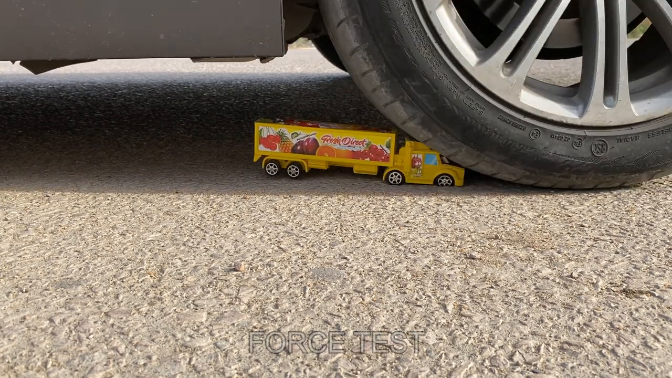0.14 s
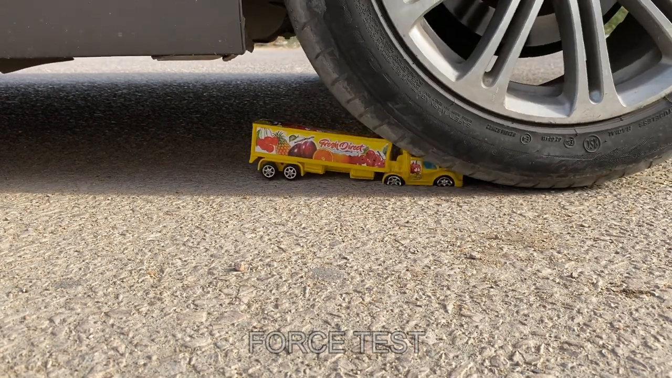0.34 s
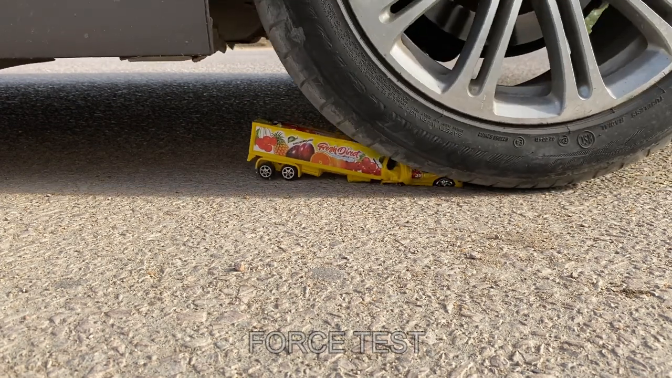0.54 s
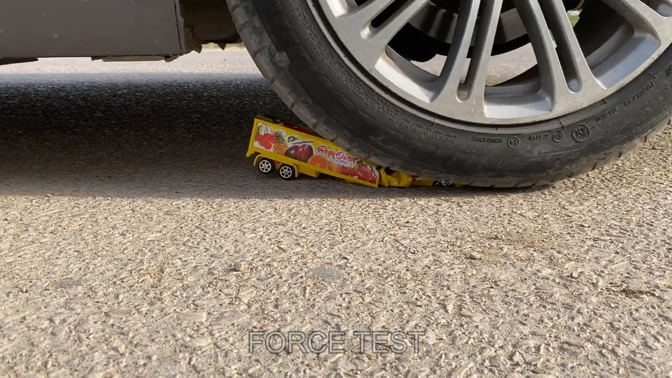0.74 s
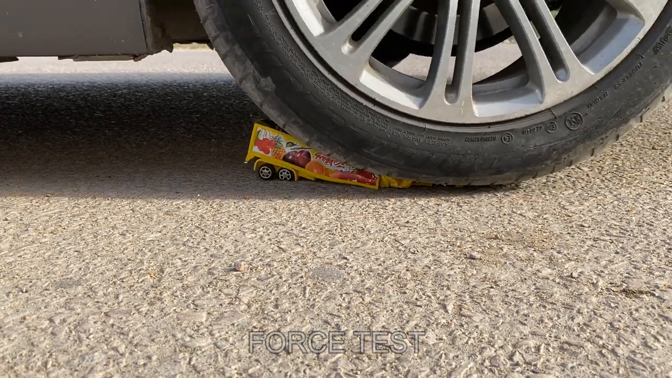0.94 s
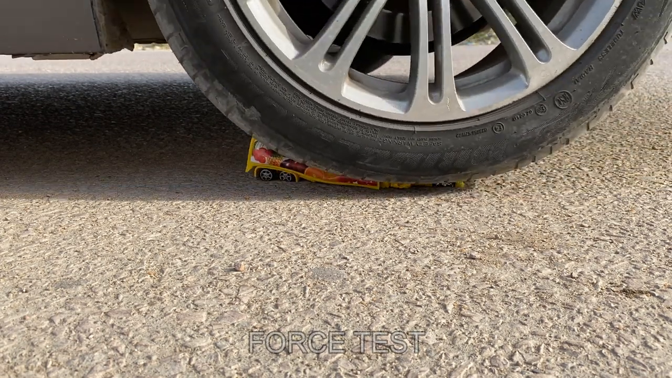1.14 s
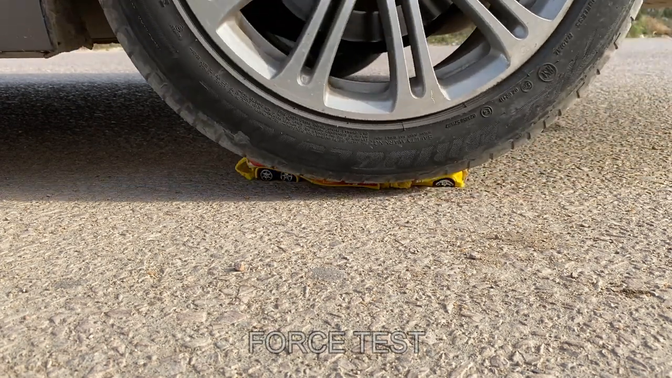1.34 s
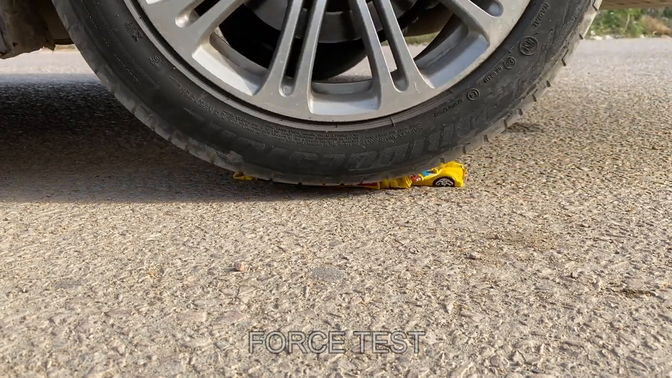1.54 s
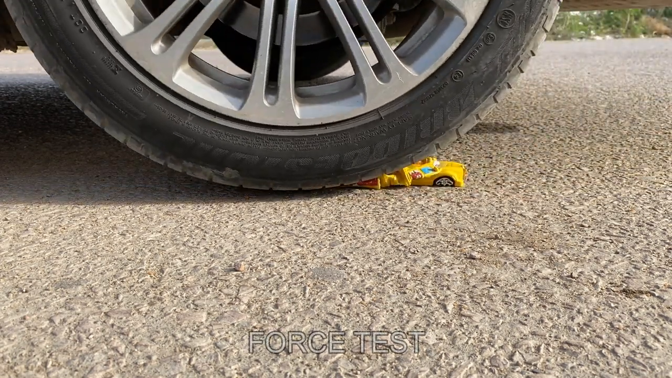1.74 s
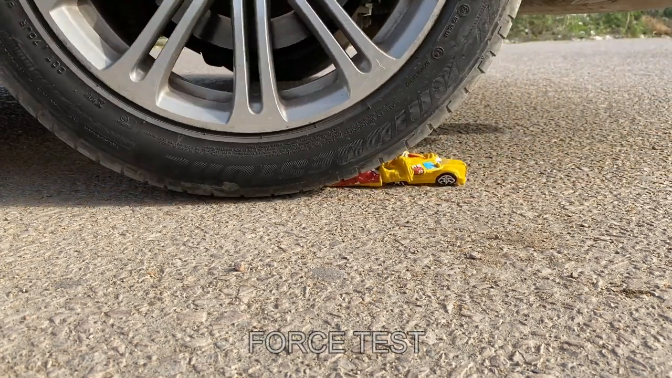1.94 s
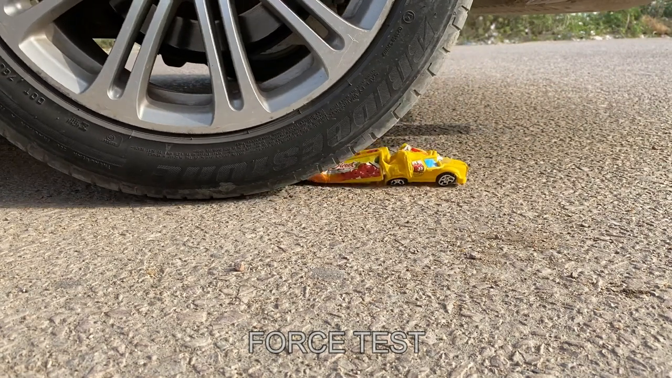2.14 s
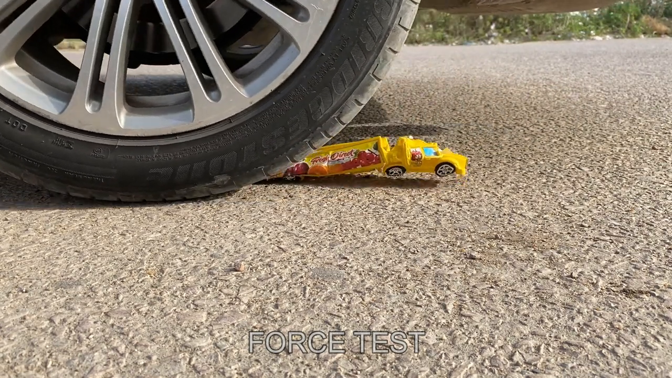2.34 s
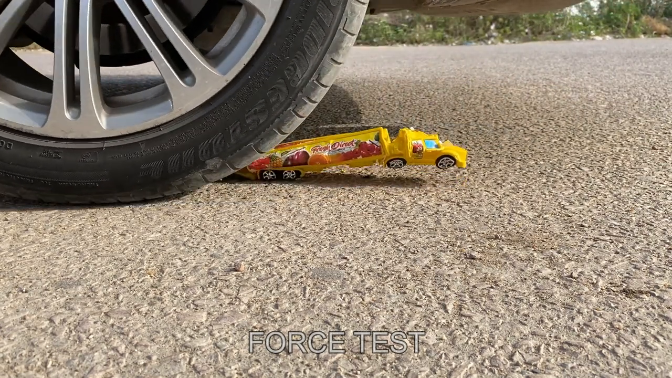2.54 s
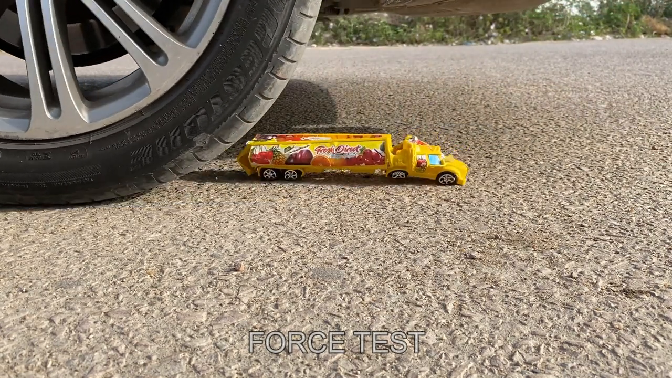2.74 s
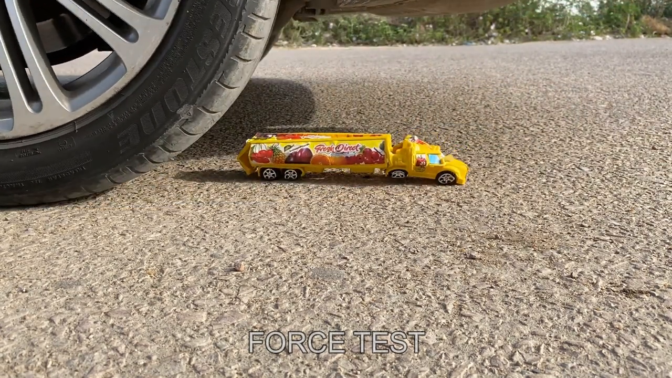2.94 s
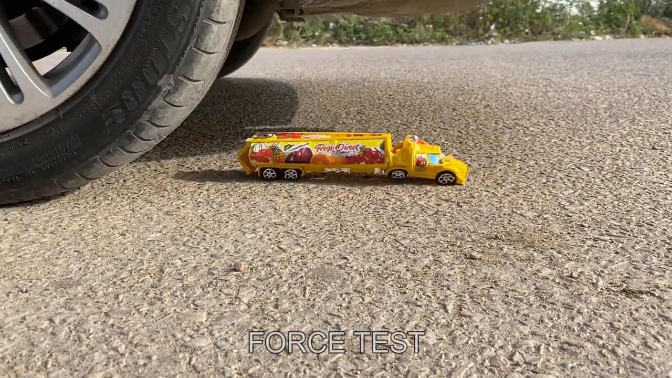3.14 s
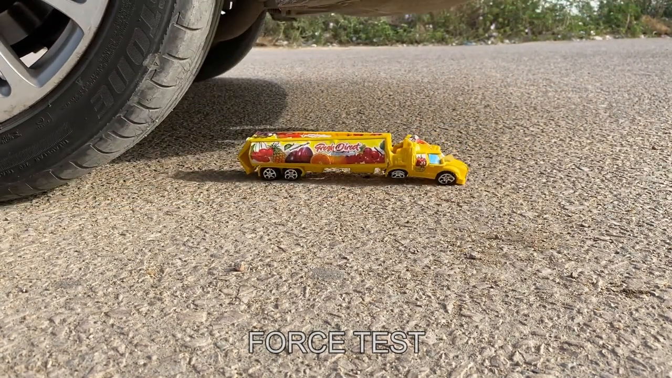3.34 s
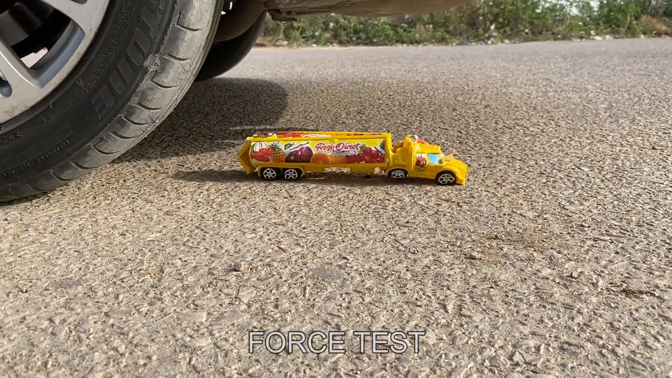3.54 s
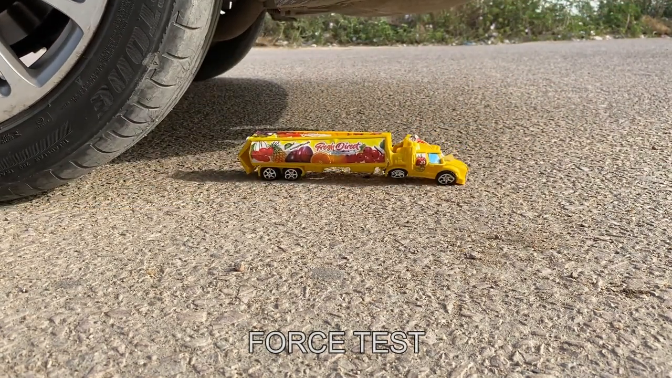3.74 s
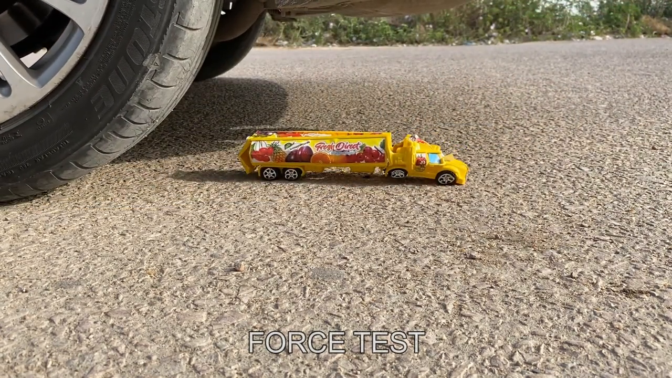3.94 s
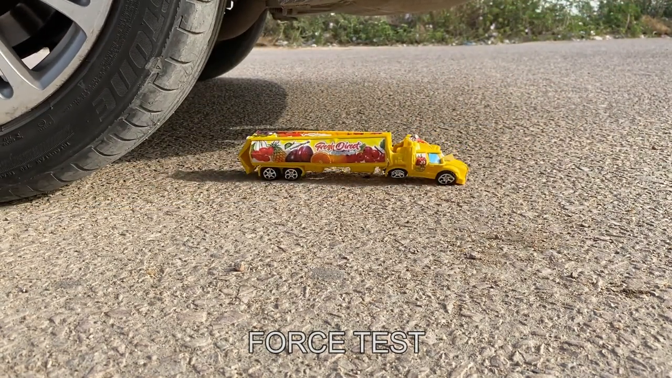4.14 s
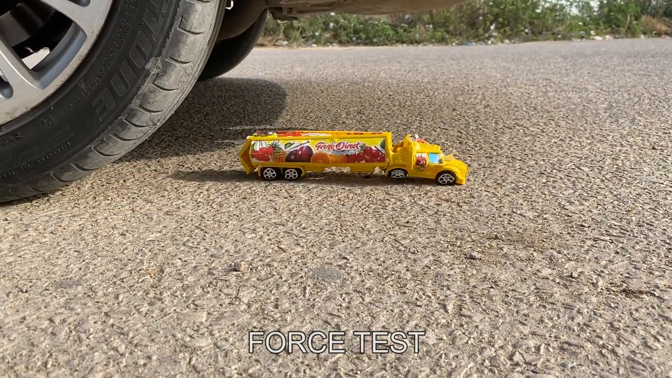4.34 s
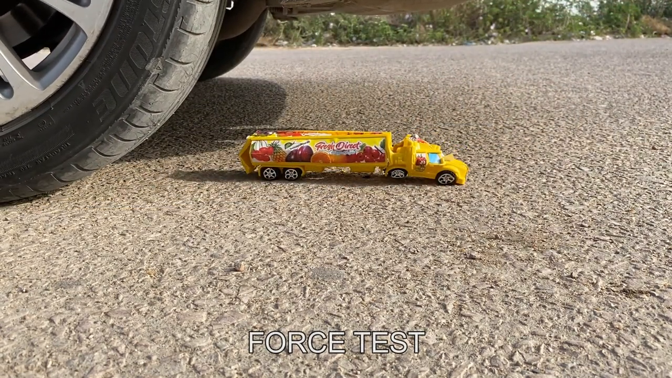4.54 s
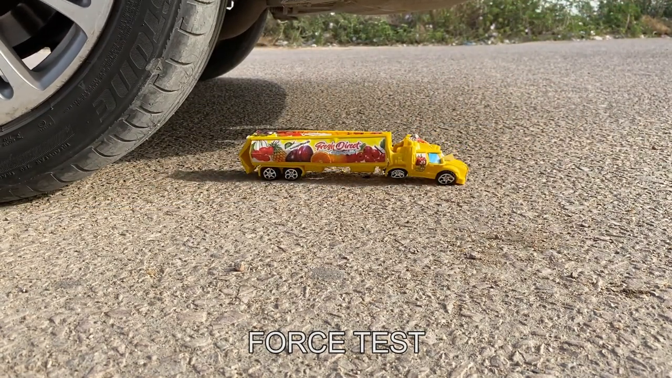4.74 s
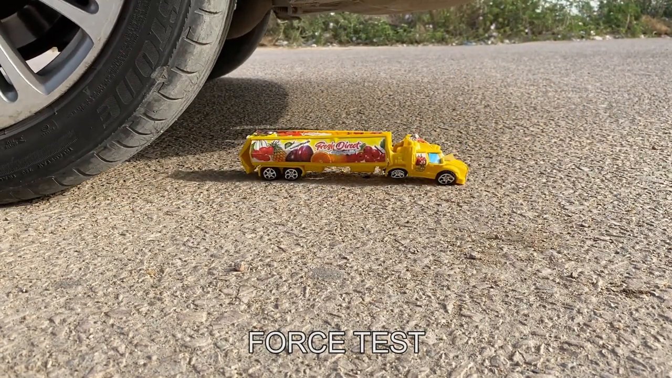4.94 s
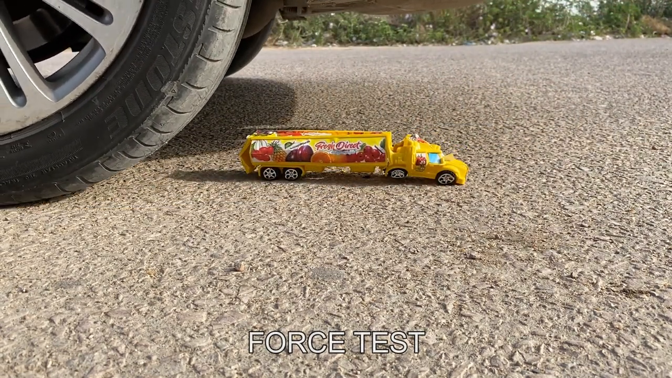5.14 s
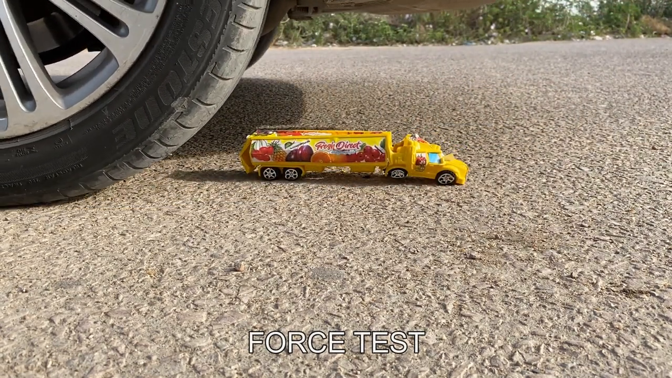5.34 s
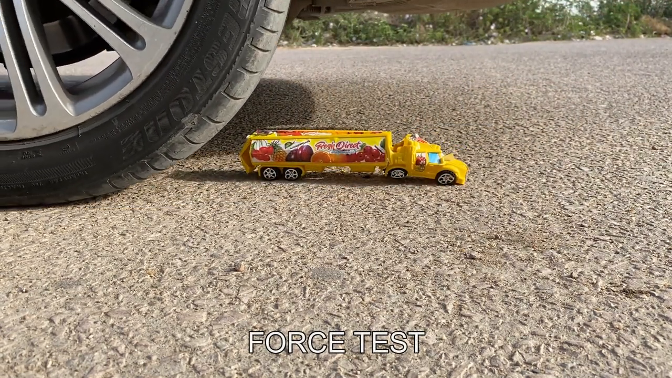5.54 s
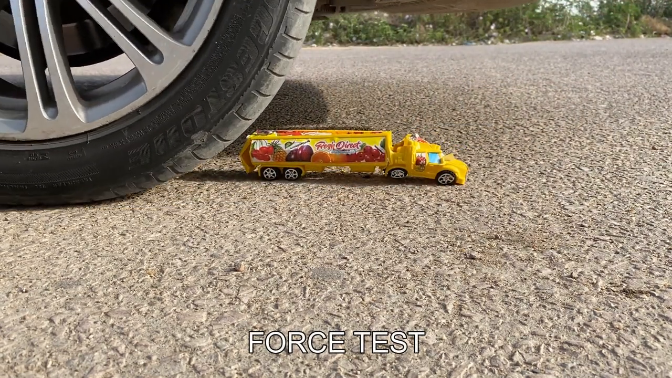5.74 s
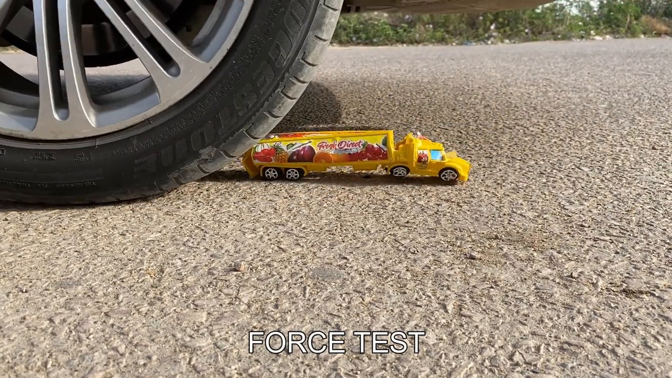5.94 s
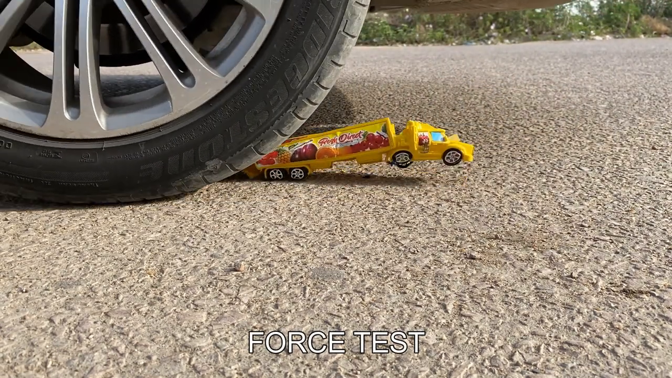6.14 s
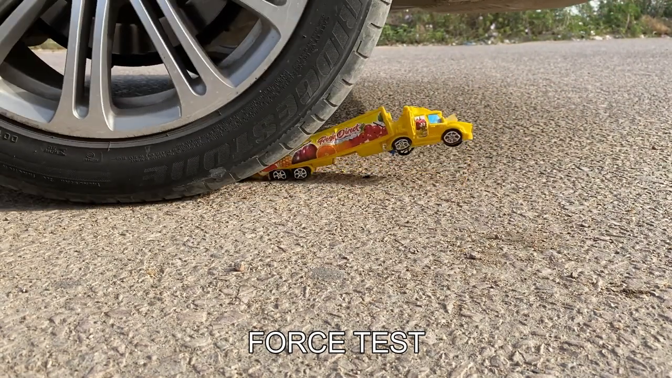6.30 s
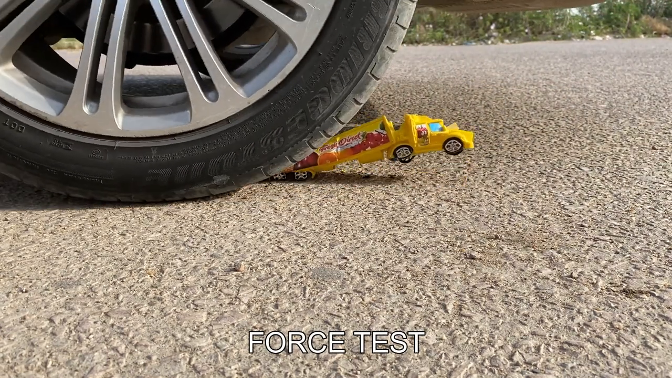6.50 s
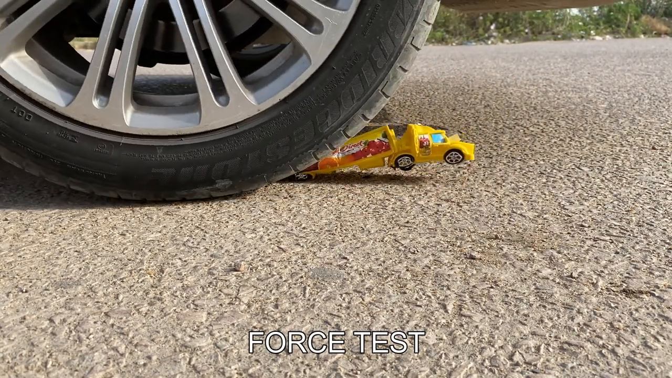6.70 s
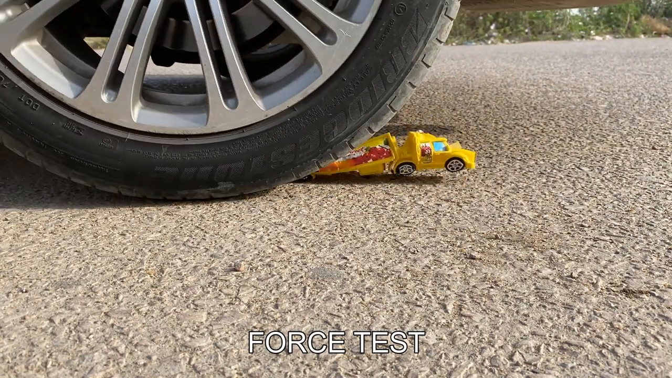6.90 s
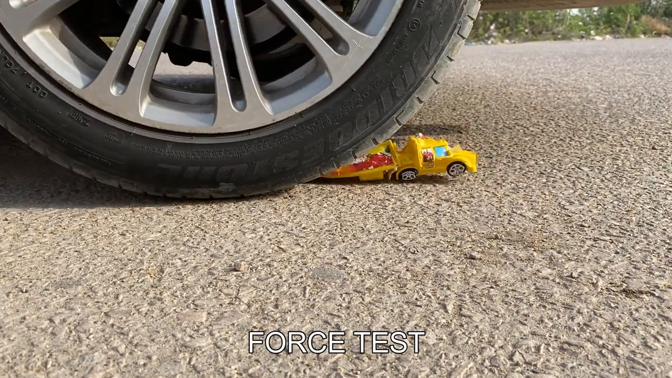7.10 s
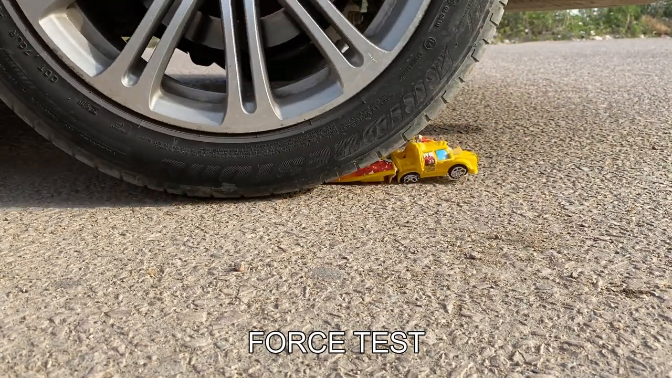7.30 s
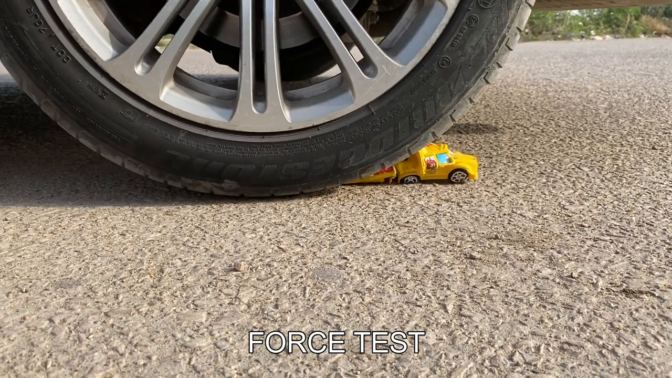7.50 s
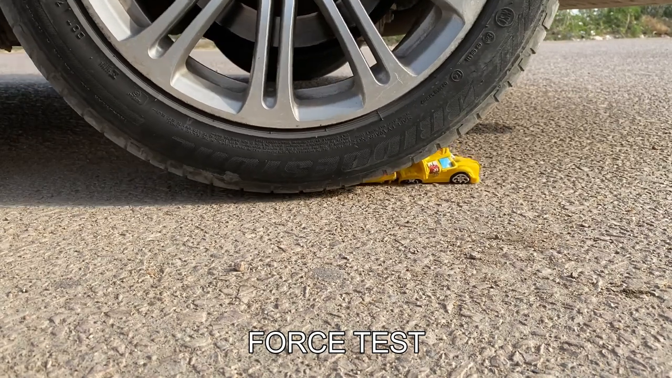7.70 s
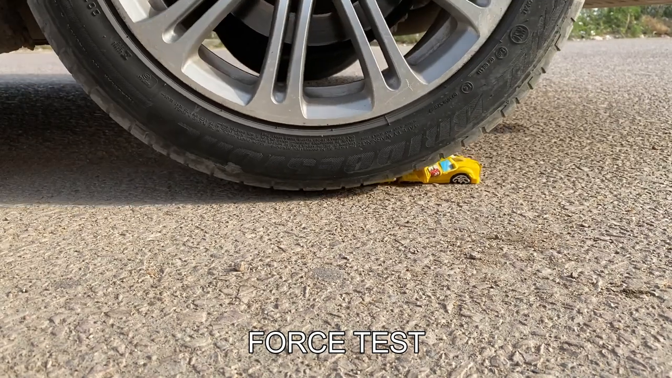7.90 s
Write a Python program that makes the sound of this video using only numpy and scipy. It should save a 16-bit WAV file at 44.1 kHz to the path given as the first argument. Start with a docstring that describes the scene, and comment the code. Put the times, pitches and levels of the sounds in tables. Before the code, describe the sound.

A low four-cylinder engine idles softly throughout, a pulsing rumble with faint rattle. From about 0.1 s a tyre bites into a hollow plastic toy on asphalt: sharp cracks, gritty rasps and fizzy splinters crowd together, with especially hard, boomy snaps near 0.4, 0.8, 0.9 and 1.2 s. After 1.4 s the crunching thins to small ticks, with a brighter snap near 2.1 s and tiny squeaks until 2.7 s. From 3 to 4.7 s there is mainly idle, rising in level and slightly in pitch; two soft dull bumps come at 4.8 s as the revs briefly dip. Around 6 s plastic creaks and squeaks again, with a loud crack at 6.2 s, then irregular drier snaps and gritty crackling, strong near 7.3, 7.5, 7.65 and 7.85 s, ending on a short harsh squeak at 7.9 s. Close, dry, ground-level outdoor sound with a very short under-car echo.

```python
"""A hollow plastic toy cracks and snaps under a car tyre on asphalt: bursts of force excite panel and air modes.
The car creeps over it, rolls off, waits and comes back; bent plastic creaks and squeaks by stick-slip.
The four-cylinder engine is a train of exhaust pulses coloured by its pipe, with flow noise, a softly
rattling valve gear and faint steady tones. Two microphone ports close to the ground hear the sum."""
import sys
import numpy as np
from scipy import signal
from scipy.fft import rfft, irfft, next_fast_len
from scipy.io import wavfile
from scipy.ndimage import uniform_filter1d, map_coordinates

SR = 44100
rng = np.random.default_rng(int(sys.argv[2]) if len(sys.argv) > 2 else 0)


def generate_wav(signal):
    """Clip the signal to [-1, 1] and save it as 16-bit WAV at the path in sys.argv[1]."""
    frames = np.transpose(np.atleast_2d(signal))
    scaled = np.clip(frames, -1, 1) * 32767
    pcm = np.round(scaled).astype(np.int16)
    wavfile.write(sys.argv[1], SR, pcm)


N = 351036

# Crankshaft speed: (time [s], speed [turns/s])
SHAFT_SPEED = [(0, 13.8), (.95, 13.83), (1.2, 13.69), (3.35, 13.69), (3.7, 14.44), (4.2, 14.53),
               (4.4, 15.1), (4.7, 14.95), (4.85, 14.4), (5.0, 13.3), (5.2, 13.35), (5.45, 14.2),
               (5.7, 14.37), (6.25, 14.35), (6.8, 14.635), (7.4, 14.42), (7.96, 14.46)]
# Engine loudness: (time [s], exhaust level [dB], engine bay level [dB])
ENGINE_LEVELS = [(0.0, -42.5, -47), (1.13, -40.5, -49), (1.42, -43.5, -50), (3.94, -34, -45.5),
                 (4.57, -28.5, -43), (4.88, -31.5, -42.5), (5.6, -29.5, -40), (7.96, -27, -36)]
# Colour of the exhaust pulse: (frequency [Hz], relative gain [dB])
PIPE_GAIN = [(14, -49), (22, 0.5), (29, -0.5), (41, -16), (58, 5), (73, 6), (88, -5), (150, 0.5),
             (197, -12), (235, -10), (284, -34), (320, -29), (500, -28), (1100, -120)]
# Spectrum of flow noise in the pipe: (frequency [Hz], relative density [dB])
FLOW_SPECTRUM = [(20, -41), (48, -6.5), (78, 10.5), (108, 6.5), (147, 6), (228, -3.5), (267, -1.5),
                 (600, -30.5), (780, -36), (1320, -120)]
# Spectrum of the engine bay rattle: (frequency [Hz], relative density [dB])
BAY_SPECTRUM = [(150, 3.5), (300, 1), (600, -4), (1000, -8), (1400, -11), (1900, -15.5), (2400, -16.5),
                (3800, -25), (4900, -24.5), (7000, -34), (11000, -33), (15500, -41)]
# Modes rung by the valve knock, passed twice: (frequency [Hz], width of one pass [Hz], gain of one pass [dB])
VALVE_MODES = [(2400, 750, 0), (5000, 900, -4)]
# Thin tones of the running engine: (frequency [Hz], amplitude beside the rattle [dB])
ENGINE_TONES = [(1400, -16), (11345, -40)]
# Phase of the engine bay, off to one side: (frequency [Hz], lead of the left channel [rad])
BAY_PHASE = [(0, 0), (300, .5), (2700, 6.2), (5400, 5.9), (6400, 6.3), (16500, 6.3)]

# Plastic rubbing under the tread: (time [s], creak level [dB])
CREAK_LEVEL = [(0, -56.5), (.3, -62), (1.35, -60), (1.5, -67.5), (2.25, -61.5), (2.75, -62), (3.1, -66.5),
               (5.8, -67.5), (6.0, -54), (6.2, -49), (6.62, -57.5), (6.75, -55.5), (6.9, -55), (7.15, -51),
               (7.72, -52), (7.86, -50.5), (7.91, -35.5), (7.96, -43)]
GRIT_DB = -5  # grit beside the creak [dB], at the mean creak level
GRIT_GROWS = 0.2  # dB more of that for each dB of creak

# Decay in the gap between car floor and road: (frequency [Hz], time to fall 60 dB [s])
GAP_DECAY = [(300, 0.11), (2000, 0.055), (8000, 0.031)]

# Cracks of the shell: (time [s], level [dB], strongest pitch [Hz], rasp beside it [dB], fizz beside it [dB])
CRACK_EVENTS = [(0.095, -13, 623, 5.5, 3.5), (0.148, -17, 1850, 5, -3), (0.273, -27, 3970, -1, 7),
                (0.292, -14, 2430, -1, 0.5), (0.302, -9.5, 1840, 4, -9), (0.306, -13.5, 705, -29, -30),
                (0.338, -33, 867, 2, 12), (0.35, -21.5, 900, 6, 2), (0.355, -20, 616, 7, -17),
                (0.372, -3, 1360, -4, -10.5), (0.374, -6.5, 518, -29, -26), (0.395, -19.5, 3220, 6.5, -1),
                (0.407, -18.5, 3200, -2, -1), (0.428, -34, 3060, 5, 5.5), (0.447, -30, 2970, 6.5, 4),
                (0.475, -31, 2770, 21, -3), (0.481, -25, 720, -8, 5), (0.512, -14, 4630, 1, 5.5),
                (0.541, -30, 4500, 4, 6), (0.567, -33.5, 5670, 5, 12), (0.626, -11, 987, 6, -3.5),
                (0.637, -21.5, 750, 3, -11), (0.658, -13, 660, 7.5, -12), (0.688, -18.5, 654, 8.5, 4),
                (0.72, -41, 3020, -3, 14), (0.747, -25.5, 5000, -21, 0), (0.772, -21, 1270, 7, -20),
                (0.786, -5, 2160, 2, -42), (0.892, -3.5, 1980, -2.5, -29), (0.89, -8, 632, -21, -12),
                (0.958, -6, 1010, -4, -15), (0.972, -21.5, 730, 2, -25), (1.003, -36, 724, -3, -3),
                (1.026, -25, 1700, -13, -6.5), (1.075, -12, 1290, 4, -6), (1.105, -10.5, 830, -4, -4),
                (1.129, -17, 1710, 3.5, 5), (1.186, -4.5, 1865, -1, -3), (1.213, -22.5, 695, 5, -14),
                (1.228, -18.5, 1440, 1.5, -3.5), (1.29, -11, 1630, -11, -40), (1.313, -15.5, 4760, 6, 8.5),
                (1.336, -12.5, 1700, 5, 2), (1.387, -40, 2040, 6, 11), (1.424, -25, 2400, 0, -1.5),
                (1.655, -42, 840, 9, -21), (1.72, -38, 2560, 7.5, 5.5), (1.747, -31, 2730, 0, 1.5),
                (1.824, -35.5, 1570, -4, -7), (1.886, -42, 1990, 1, -9), (1.959, -37, 1700, -23, -23),
                (2.07, -14.5, 4800, 5.5, -8), (2.083, -32, 3040, 14.5, -20), (2.203, -30, 3520, 3, 2),
                (2.228, -36, 1360, 7, 11), (2.212, -40, 1350, 0, -10), (2.237, -26.5, 1220, 8, -12),
                (2.275, -37, 1970, 15.5, 17), (2.39, -26.5, 930, -25, -11.5), (2.424, -36.5, 3180, -11, -7),
                (2.47, -38, 1900, -18, -7), (2.668, -33, 1470, 0.5, -23), (2.835, -42, 3620, -9, -5),
                (2.907, -33, 3600, -21, -7), (3.415, -31, 1610, 1, -15), (5.221, -42.5, 3500, 5, 6),
                (5.968, -32.5, 1030, -25, -4), (5.999, -23.5, 1540, -30, -10), (6.102, -33.5, 650, -17, 13),
                (6.159, -16, 1060, -19, 1), (6.177, -16.5, 1050, 0, -1), (6.19, -3.5, 1080, -8, -1.5),
                (6.1911, -6, 1076, -1, -20), (6.192, -13, 710, -25, -25), (6.193, -19, 390, -25, -25),
                (6.329, -22.5, 1000, -25, -3.5), (6.38, -28.5, 1290, -21, -26),
                (6.445, -24.5, 1920, -1, -4), (6.477, -20.5, 1940, -16, 4.5),
                (6.531, -11.5, 1950, -3.5, -4), (6.71, -17.5, 1180, 3, -4.5),
                (6.725, -19.5, 1870, -22, -11), (6.828, -29, 1920, -20, -23), (6.946, -30, 806, 14.5, 3),
                (7.031, -20, 1360, 4.5, -9), (7.108, -40, 637, 17, 18), (7.143, -20, 780, 12, -1),
                (7.169, -14, 1370, 3, -3.5), (7.265, -27, 920, -3.5, -15), (7.319, -9.5, 1720, -22, -14),
                (7.345, -33, 2830, 6, 4), (7.388, -41.5, 2070, -14, 20), (7.412, -31, 1450, 8, 6.5),
                (7.454, -6.5, 985, 1, -11), (7.506, -35, 5000, 2, 12), (7.551, -34.5, 1180, 9.5, 6),
                (7.634, -31, 1220, 6.5, -7), (7.654, -8, 1570, 7.5, -0.5), (7.828, -14, 1035, 8, -36),
                (7.842, -8.5, 1380, 1.5, -39), (7.9, -14, 1600, -22, -7), (7.88, -22, 4550, -10, -14)]
# Modes of the toy's air and walls: (frequency [Hz], width [Hz], gain [dB])
SHELL_MODES = [(263, 29, 14.5), (380, 170, 9), (495, 32, 20.5), (830, 227, 24.5)]
# A small, high panel leaves the hollow to boom on its own; at a low pitch the panel's ring is the boom
BOOM_DB, BOOM_FROM_HZ, BOOM_FALLS_DB = -3.5, 1080, 64  # base level, lowest full pitch, fall per octave below
BOOM_GROWS = 0.43  # dB more boom for each dB of crack: big splits move the whole shell
FLAT_S, FLAT_DB = 1.5, -7  # from this time [s] the flattened shell booms less, by this level [dB]
TEARING = .1  # strength of the tearing beside the snap
RASP_FROM, RASP_FROM_HZ = 0.55, 1150  # the rasp starts at this share of the pitch, never higher than this

# Short squeaks of sliding plastic: (time [s], length [s], first pitch [Hz], level [dB])
SCRAPE_EVENTS = [(2.41, 0.012, 1046, -49), (2.472, 0.027, 1625, -56), (2.54, 0.015, 2310, -54.5),
                 (2.608, 0.016, 1146, -52), (2.702, 0.011, 1180, -54), (2.717, 0.013, 1600, -49),
                 (6.006, 0.013, 1560, -42), (6.027, 0.017, 1640, -45), (6.06, 0.032, 2240, -52),
                 (6.246, .012, 1960, -49), (6.297, .015, 1780, -45), (6.37, 0.025, 2020, -50),
                 (6.505, 0.011, 1900, -44), (6.75, 0.032, 2020, -47.5), (6.911, 0.033, 1700, -45.5),
                 (7.913, 0.014, 1700, -27), (7.917, 0.027, 3260, -42), (7.926, 0.0045, 1700, -39)]
SCRAPE_FALLS, SCRAPE_WIDTH_HZ = 0.165, 720  # share of the pitch lost by the end; roughness

# Dull bumps as the gear engages: (time [s], level [dB])
BUMP_EVENTS = [(4.796, -24.5), (4.84, -26.5)]

# Phase between the microphone ports: (frequency [Hz], lead of the left channel [rad])
PORT_PHASE = [(0, 0), (1500, .1), (2800, .6), (4900, .5), (6000, 0), (7400, -.1), (8350, -2.8),
              (9560, -3.5), (10500, -6), (11600, -6.5), (12500, -9), (13700, -9.6), (14600, -12.3),
              (16500, -12.6)]
TOP_HZ = 17000  # band limit


def amp(db):
    """Level law: an amplitude ratio is ten to the power of dB/20."""
    return 10 ** (np.asarray(db) / 20)


def unit(x):
    """Root-mean-square normalisation: scaled to rms 1."""
    return x / np.sqrt(np.mean(x ** 2) + 1e-20)


def peak(x):
    """Peak normalisation: scaled to peak 1."""
    return x / np.abs(x).max()


def burst(x):
    """Energy normalisation of a short burst, to a peak near 1."""
    return 3 * x / np.linalg.norm(x)


def along(points, hz):
    """Interpolation of (Hz, value) points on a logarithmic frequency axis."""
    f, value = np.transpose(points)
    return np.interp(np.log(hz + 1), np.log(f + 1), value)


def curves(rows):
    """Linear interpolation in time: one value per sample for each column after the time."""
    times, *columns = np.transpose(rows)
    return [np.interp(np.arange(N) / SR, times, column) for column in columns]


def wobble(rate):
    """Slow random fluctuation: a smooth curve through `rate` random knots a second."""
    knots = rng.standard_normal(int(N * rate / SR) + 4)
    return map_coordinates(knots, [np.arange(N) * rate / SR])


def spread(unlike):
    """Partial coherence: two white noises that share all but a part."""
    mid, side = rng.standard_normal((2, N))
    return unit(np.array([mid + unlike * side, mid - unlike * side]))


def filtered(x, response):
    """Linear filtering: the spectrum times a complex response of frequency."""
    length = x.shape[-1]
    m = 2 * next_fast_len(length // 2 + min(length // 8, 8192))  # padded against wrap-around
    return irfft(rfft(x, m) * response(np.fft.rfftfreq(m, 1 / SR)), m)[..., :length]


def causal(points):
    """Minimum phase: a gain given by (Hz, dB) points fixes the phase, by folding the cepstrum."""
    def response(hz):
        cepstrum = irfft(np.log(amp(along(points, hz)) + 1e-6))
        cepstrum[1:len(hz) - 1] *= 2
        cepstrum[len(hz):] = 0
        return np.exp(rfft(cepstrum))
    return response


def lead(points):
    """Interchannel phase: the left side leads, half of the angle on each channel."""
    f, turn = np.transpose(points)
    return lambda hz: np.exp(.5j * np.outer([1, -1], np.interp(hz, f, turn)))


def mode(f, hz, width):
    """Damped resonance: one causal mode with gain 1 at its centre."""
    return 1j * f * width / (hz * hz - f * f + 1j * f * width)


def modes(table):
    """Modal superposition: several resonances side by side."""
    return lambda f: sum(amp(db) * mode(f, hz, width) for hz, width, db in table)


def exhaust(firings, unevenness_db, beat):
    """Pulse excitation of a pipe: two puffs a turn, one stronger, with flow noise that throbs along."""
    at = np.flatnonzero(np.diff(np.floor(firings)))
    alternation = 1 - .31 * (-1.) ** np.arange(len(at))
    puffs = np.zeros(N)
    puffs[at] = -alternation * amp(unevenness_db)
    # the upper part of each puff takes a longer way through the silencer: 15.61 ms above 85 Hz
    detour = lambda hz: np.exp(-2j * np.pi * 0.01561 * np.clip(hz - 85, 0, None))
    throb = unit(filtered(puffs, lambda hz: causal(PIPE_GAIN)(hz) * detour(hz)))
    flow = spread(unlike=0.29) * amp(0.58 * beat)
    flow = unit(filtered(flow, lambda hz: amp(along(FLOW_SPECTRUM, hz))))
    return throb * amp([[-.4], [.4]]) + amp(-7) * flow


def valve_knock(firings, speed, unevenness_db):
    """Impact excitation: once a firing a short noisy burst of uneven strength rings the valve gear."""
    since = (firings - .59) % 1 / (2 * speed)  # seconds since the last knock
    which = np.clip(firings.astype(int) - 1, 0, len(unevenness_db) - 1)
    strength = amp(unevenness_db)[which]
    noise = spread(unlike=0.55) * strength * amp(-60 * since / 0.074)
    return unit(filtered(noise, lambda f: modes(VALVE_MODES)(f) ** 2))


def engine_tones():
    """Modulated sinusoids: thin tones waver in level and phase."""
    t = np.arange(N) / SR
    return sum(amp(db + 2.7 * wobble(6.3)) * np.sin(2 * np.pi * hz * t + 2.3 * wobble(25))
               for hz, db in ENGINE_TONES)


def engine():
    """Periodic excitation: two firings a turn drive the exhaust and shake the engine bay."""
    speed, = curves(SHAFT_SPEED)
    exhaust_db, bay_db = curves(ENGINE_LEVELS)
    firings = 2 * np.cumsum(speed) / SR + 0.73
    count = np.count_nonzero(np.diff(np.floor(firings)))
    chance = rng.standard_normal((count, 2))
    beat = np.cos(2 * np.pi * (firings - .54))
    pipe = exhaust(firings, 1.1 * chance[:, 0], beat)
    rattle = spread(unlike=0.41) * amp(0.72 * beat + 0.91 * wobble(20))
    rattle = unit(filtered(rattle, lambda hz: amp(along(BAY_SPECTRUM, hz))))
    knock_db = -17.5 + 0.086 * (bay_db - bay_db.mean())
    knock = amp(knock_db) * valve_knock(firings, speed, 1.5 * chance[:, 1])
    bay = filtered(rattle + knock + engine_tones(), lead(BAY_PHASE))
    return amp(exhaust_db) * pipe + amp(bay_db) * bay


def grains(count, hz, scatter, cycles, size):
    """Granular superposition: tiny damped rings at random moments, log-normal in pitch, uneven in strength."""
    when, pitch = rng.random(count), rng.standard_normal(count)
    strength = rng.exponential(size=count)
    t = np.arange(size) / SR
    tone = np.clip(hz * np.exp(scatter * pitch), 700, 16000)[:, None]
    gain = amp(3.9 * np.minimum(strength, 4.5))[:, None]
    rings = gain * np.sin(2 * np.pi * tone * t) * np.exp(-t * tone / cycles)
    at = (when * N).astype(int)[:, None] + np.arange(size)
    return unit(np.bincount(at.ravel(), rings.ravel(), N)[:N])


def creak():
    """Stick-slip: bent plastic jerks over the asphalt, each jerk rings a few cycles; grit crackles above."""
    creak_db, = curves(CREAK_LEVEL)
    clumps_db = 2.5 * wobble(25)
    slips = grains(count=5000, hz=1700, scatter=0.33, cycles=3.3, size=440)
    grit = grains(count=14000, hz=6610, scatter=0.593, cycles=11.0, size=90)
    grit_db = GRIT_DB + GRIT_GROWS * (creak_db - creak_db.mean())
    return amp(creak_db + clumps_db) * (slips + amp(grit_db) * grit)


def hollow(x, piece=SR // 5):
    """Reverberation between car floor and road: a fresh decaying tail every 0.2 s, as the gap changes."""
    out = np.zeros((2, N + 2 * piece))
    for a in range(0, N, piece):
        hz, t, z = signal.stft(rng.standard_normal((2, piece)), SR, nperseg=128)
        decay = amp(-60 * t / along(GAP_DECAY, hz)[:, None])
        tail = signal.istft(z * decay, SR, nperseg=128)[1][:, :piece]
        tail = tail / np.linalg.norm(tail[0])
        wet = signal.fftconvolve(x[None, a:a + piece], tail, axes=1)
        out[:, a:a + wet.shape[1]] += wet
    return np.pad(out, ((0, 0), (90, 0)))[:, :N]  # the echo starts 90 samples late


def crack(t, db, hz, rasp_db, fizz_db):
    """Impulsive fracture: one split rings the torn panel, booms in the hollow, rasps and fizzes."""
    tear = rng.standard_normal((3, len(t))) * (1 - np.exp(-t / 0.00052)) ** 2
    tear[1:] *= amp(1.5 * rng.standard_normal((2, len(t))))  # spiky: many fibres let go one by one
    snap = t == t[30]
    force = TEARING * tear[0] * amp(-60 * t / 0.016) + snap

    upper = 1.754 * np.exp(0.23 * rng.standard_normal())  # every torn panel has its own second ring
    main = lambda f: mode(f, hz, 220 + .25 * hz) ** 2
    panel = lambda f: main(f) + 0.32 * mode(f, upper * hz, 200 + 0.59 * hz) ** 2
    ring = filtered(force, lambda f: panel(f) * mode(f, 0.81 * hz, 36.0 * hz))

    boom = filtered(force, lambda f: modes(SHELL_MODES)(f) * mode(f, 430, 930))
    boom_db = BOOM_DB + FLAT_DB * 0 + BOOM_GROWS * db
    boom_db += BOOM_FALLS_DB * min(np.log2(hz / BOOM_FROM_HZ), 0)

    shards = np.clip(3500 * np.exp(0.489 * rng.standard_normal(3)), 900, 9000)  # Hz, new at every crack
    splinters = lambda f: 1 + sum(0.8 * mode(f, c, 0.13 * c) for c in shards)
    edge_hz = min(RASP_FROM * hz, RASP_FROM_HZ)  # a small piece cannot rasp low
    small = lambda f: (f * f / (f * f - edge_hz ** 2 - 1j * f * edge_hz)) ** 2
    rasp_decay = amp(-60 * t / 0.0075) + amp(-28.0 - 60 * t / 0.081)
    rasp = filtered(tear[1] * rasp_decay, lambda f: mode(f, 1880, 5800) ** 2 * splinters(f) * small(f))

    fizz_decay = amp(-60 * t / 0.006) + amp(-39.0 - 60 * t / 0.12)
    fizz = filtered(tear[2] * fizz_decay, lambda f: mode(f, 9050, 9100) ** 2)

    swell = 1 - np.exp(-t / 0.00072)  # the walls take a cycle or two to follow
    tonal = peak(swell * ring), peak(swell * boom)
    noisy = amp(rasp_db) * burst(rasp) + amp(fizz_db) * burst(fizz)
    return tonal[0], amp(boom_db) * tonal[1], noisy


def cracks():
    """Superposed fractures: each split is placed at its time; the flattened shell booms less."""
    out, t = np.zeros(N + SR), np.arange(SR // 15) / SR
    for s, db, hz, rasp_db, fizz_db in CRACK_EVENTS:
        ring, boom, noisy = crack(t, db, hz, rasp_db, fizz_db)
        flat = amp(FLAT_DB * (s > FLAT_S))
        out[round(s * SR):][:len(t)] += amp(db) * (ring + flat * boom + noisy)
    return out[:N]


def scrapes():
    """Sliding friction: a piece squeaks a moment, rough and narrow-band, and sinks in pitch as it slows."""
    out = np.zeros(N + SR)
    for s, length, hz, db in SCRAPE_EVENTS:
        u = np.arange(round(length * SR)) / (length * SR)  # 0 to 1 through the squeak
        turn = 2 * np.pi * hz * length * (u - SCRAPE_FALLS * u * u / 2)
        noise = rng.standard_normal((2, SR // 10))
        a, b = uniform_filter1d(noise, int(SR / SCRAPE_WIDTH_HZ), axis=1)[:, :len(u)]
        squeak = unit((a + 0.03) * np.sin(turn) + b * np.cos(turn))
        envelope = np.sqrt(4 * u) * (1 - u) * 2
        out[round(s * SR):][:len(u)] += amp(db) * envelope * squeak
    return out[:N]


def bumps():
    """Damped oscillation: short soft thuds at 400 Hz in the car's floor."""
    out, t = np.zeros(N), np.arange(SR // 10) / SR
    for s, db in BUMP_EVENTS:
        envelope = amp(db - 60 * t / 0.042) * (1 - np.exp(-t / 0.0026))
        out[round(s * SR):][:len(t)] += envelope * np.sin(2 * np.pi * 400 * t)
    return out


def scene():
    """Superposition: the toy and bumps, their echoes under the car, and the engine."""
    near = cracks() + creak() + scrapes() + bumps()
    direct = near * amp([[.2], [-.2]])  # dB, left and right
    return direct + amp(-10.5) * hollow(near) + engine()


def record(dry):
    """Two-port reception: treble phases drift apart, loud peaks are squeezed, the band ends at TOP_HZ."""
    heard = filtered(dry, lead(PORT_PHASE))
    heard = heard / (1 + np.abs(heard / .93) ** 6) ** (1 / 6)
    return filtered(heard, lambda hz: np.clip((TOP_HZ - hz) / 900, 0, 1) ** 2)


dry = scene()
out = record(dry)
generate_wav(out)
```